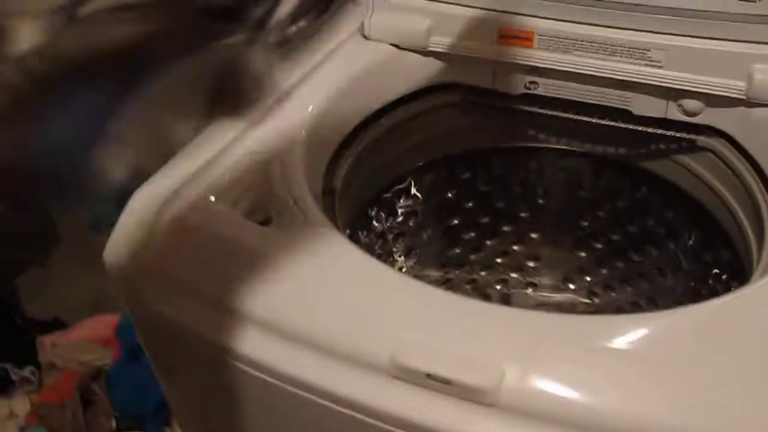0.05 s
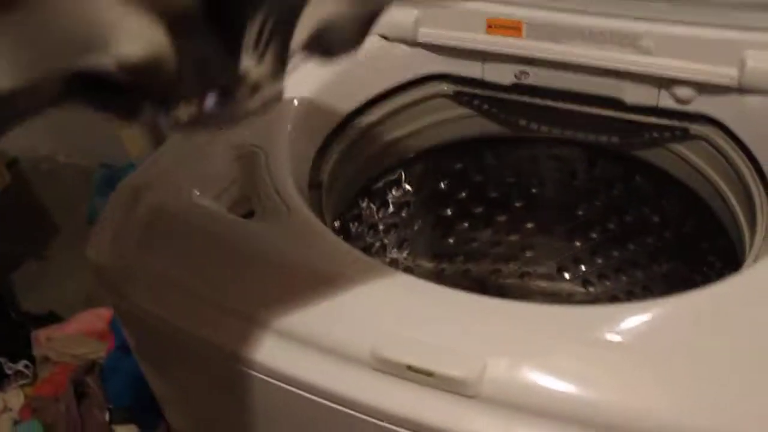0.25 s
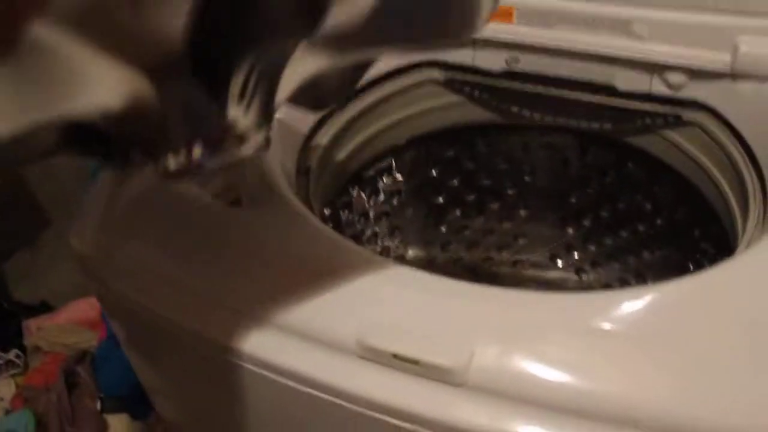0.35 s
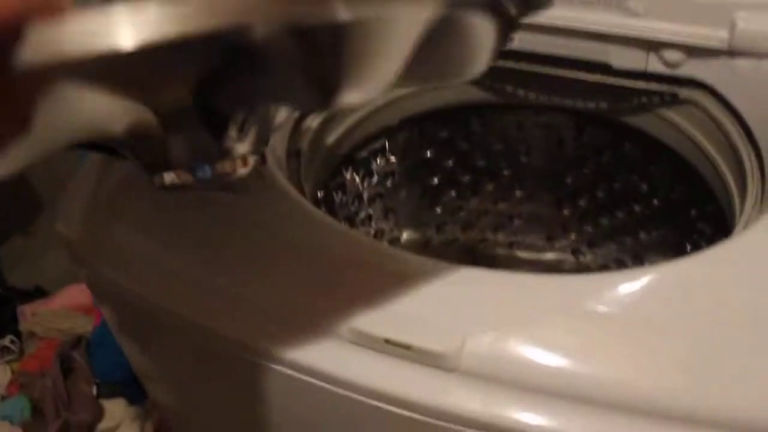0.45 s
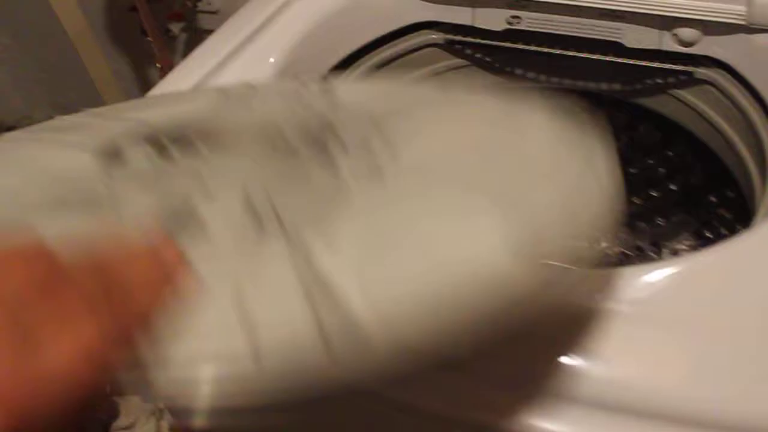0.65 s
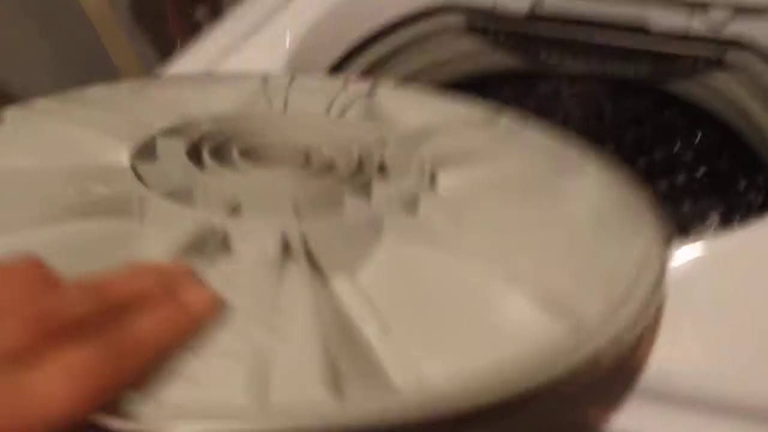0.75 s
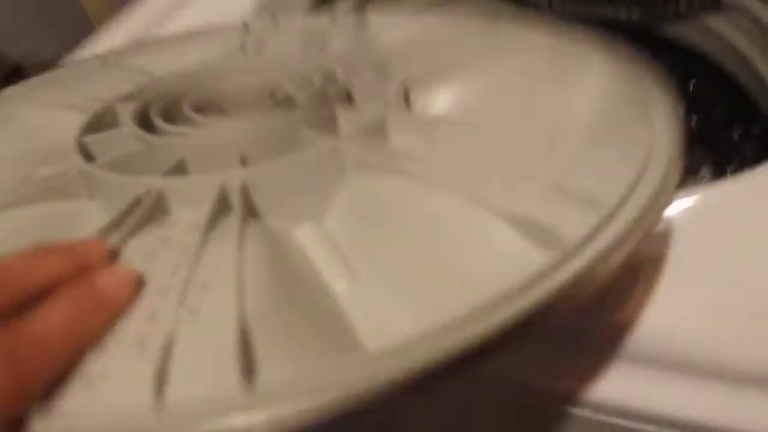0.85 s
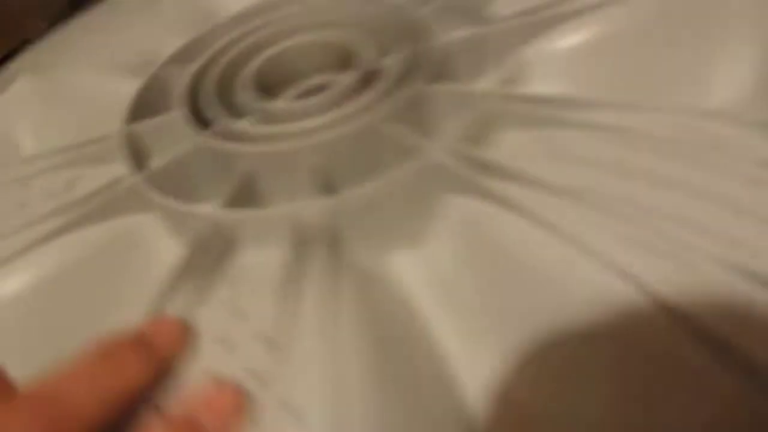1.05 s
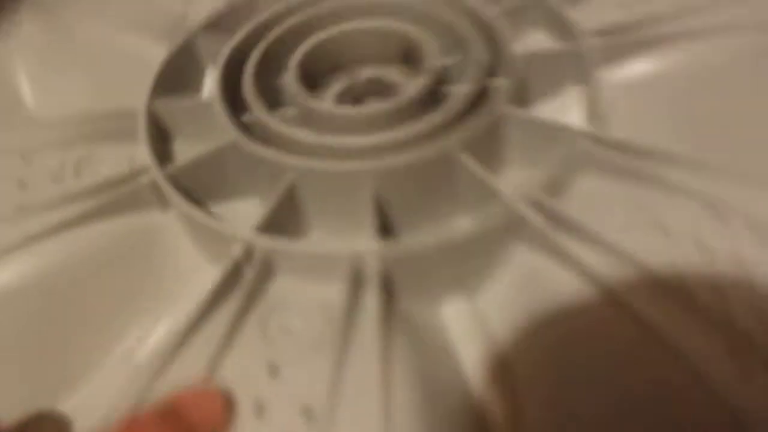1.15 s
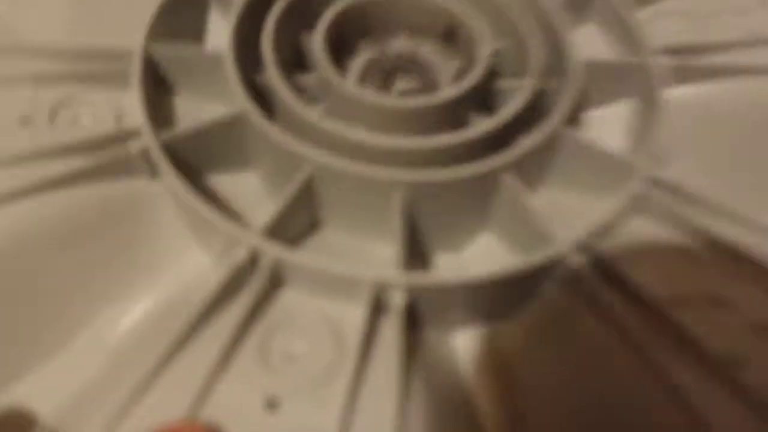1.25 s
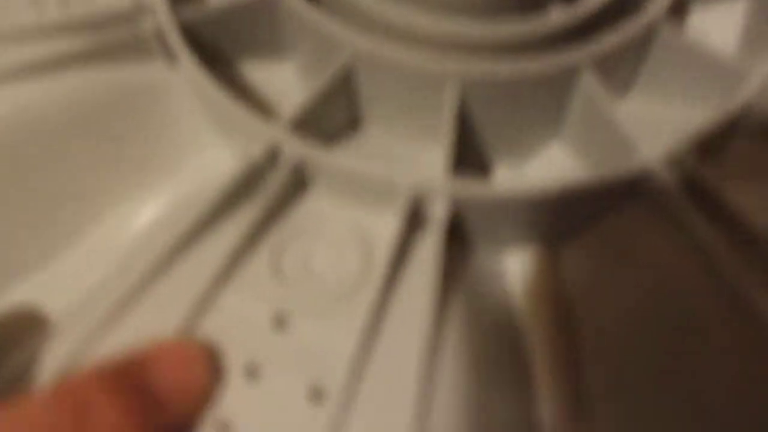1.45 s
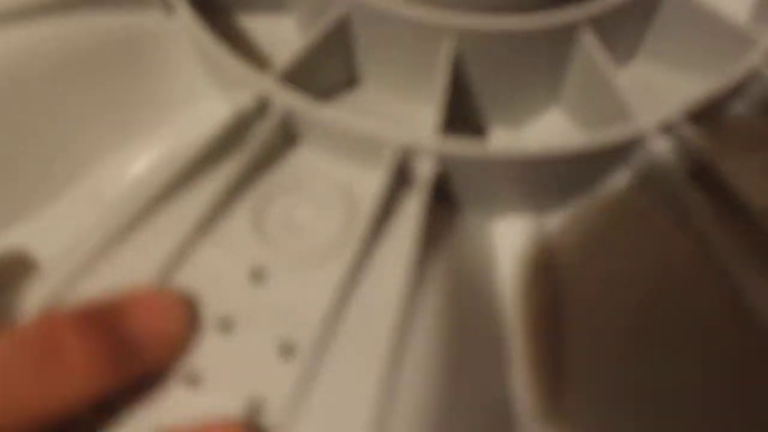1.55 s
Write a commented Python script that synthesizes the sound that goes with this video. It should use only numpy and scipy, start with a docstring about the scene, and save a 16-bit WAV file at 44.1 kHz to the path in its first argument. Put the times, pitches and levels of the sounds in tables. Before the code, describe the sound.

Sharp hard-plastic knocks, heard very close indoors. Brief sliding friction leads to clicks and an overloaded crack, then a clattering group with low cabinet boom, near quiet, and a last softer, hollow thud.

```python
"""A soft rub over a faint hum comes first, then clicks and knocks, the heavier with a hollow steel boom.
A ribbed plastic agitator plate is lifted, turned over and knocked on a washing machine in a small room.
Filtered noise makes the rub, rumble and air; a wavering sine makes the hum. Each knock is a noise crack
with damped plate modes and a room tail; heavy blows also excite damped modes of the cabinet.
The near microphone overloads on the hardest knock."""
import sys
import numpy as np
from scipy import signal
from scipy.fft import rfft, irfft, next_fast_len
from scipy.io import wavfile
from scipy.ndimage import uniform_filter1d, map_coordinates

SR = 44100
rng = np.random.default_rng(int(sys.argv[2]) if len(sys.argv) > 2 else 0)


def store_pcm(level_fs):
    """Save levels as 16-bit WAV."""
    pcm = np.round(np.clip(level_fs, -1, 1) * 32767).astype(np.int16)
    wavfile.write(sys.argv[1], SR, np.atleast_2d(pcm).T)


N = 70560  # samples in the scene
BLOW_SIZE = 24000  # samples in one blow

# quiet air of the room: frequency_hz, density_db
AIR_SPECTRUM = [(20, -41), (60, -18), (130, -6.5), (230, 4), (370, -4.5), (600, -14), (1100, -18),
                (2200, -22), (3500, -35.5), (8000, -45.5), (16000, -55.5)]
# strength of the hum: time_s, level_db
HUM_LEVEL = [(0, -49), (.15, -45), (.32, -48.5), (.45, -50.5), (1.6, -59.5)]
# low handling rumble: time_s, level_db
RUMBLE_LEVEL = [(0, -59.5), (.28, -65), (.6, -66), (.75, -40), (1.02, -48.5), (1.17, -56), (1.42, -50),
                (1.6, -47.5)]
# colour of the rumble: frequency_hz, density_db
RUMBLE_SPECTRUM = [(20, -42), (50, -29.5), (80, -4), (115, -2), (170, -11), (350, -11.5), (600, -30),
                   (2000, -59.5)]
# strength of the sliding friction: time_s, level_db
SLIDE_LEVEL = [(0, -47), (.04, -45), (.13, -42), (.2, -45), (.28, -50), (.34, -50.5), (.56, -55),
               (.645, -51), (.72, -42.5), (1, -65.5)]
# colour of the sliding friction: frequency_hz, density_db
SLIDE_SPECTRUM = [(200, -15), (350, -3.5), (700, -1.5), (1050, 1), (1400, -2.5), (2500, -6), (4500, -8),
                  (7000, -17), (11000, -19.5), (16000, -27.5)]
# light brushes of the fingers: centre_s, level_db, length_s
FINGER_BRUSHES = [(0.031, -43, 0.0032), (0.047, -44, 0.006), (1.084, -63, 0.0242), (1.148, -59, .016),
                  (1.59, -62, 0.0282)]
# blows that reach the cabinet: start_s, boom_db, panel_db
CABINET_BLOWS = [(0.356, -32, -33.5), (0.464, -37, -36), (.669, -25, -32.5), (0.759, -39, -53),
                 (0.829, -42, -40.5), (1.222, -25.5, -37), (1.385, -40, -39)]
# modes of the hollow cabinet: frequency_hz, level_db, t60_s
BOOM_MODES = [(86.7, 3, .36), (91.4, 1.5, 0.27), (99, -17, .2)]
# modes of the cabinet's panels: frequency_hz, level_db, t60_s
PANEL_MODES = [(133.6, -11.5, .6), (203.3, -5.5, 0.77), (242, -5.5, 0.25), (266.8, -5.5, 0.46),
               (307, -8.5, 0.76), (353.3, -7.5, .8), (379.6, -6.5, .55), (420, -10.5, 0.4), (490, -16.5, 1)]
# contacts of the plate: start_s, level_db, bass_db, middle_db, upper_middle_db, treble_db,
# crack_t60_s, ring_db, room_db, spot_hz (resonance of the struck spot), spot_db (its lift)
PLATE_CONTACTS = [(0.2075, -12.5, -15.5, 1, 2.5, 5.5, 0.0062, -8.5, -14, 1350, -2),
                  (0.2211, -29, -4, 6.5, 4.5, -12, 0.017, -13.5, -18, 1230, 12),
                  (.2578, -51, 1, 10, 1, 14, 0.013, -15, -26, 1800, -2),
                  (0.3458, -1, -2.5, 7, -4, -1.5, 0.011, -10.5, -16.5, 2900, 5),
                  (0.4477, -12, -3.5, 5, -6.5, -5.5, 0.0067, -9, -7, 3750, 8.5),
                  (0.6667, -9, -3, 2.5, -1.5, -2, .016, -25.5, -10, 5600, 8),
                  (0.6983, -24.5, -3, -2, -5, -3.5, .025, -7.5, -2.5, 5470, 6),
                  (.726, -32.5, -1.5, 4, -29, -2, .025, -8, -4.5, 2310, 22),
                  (0.7647, -17.5, -17, 4.5, 3, -8.5, 0.0073, -13.5, -10.5, 2150, 6.5),
                  (0.818, -42, 10, 14, 9, 0, 0.0087, -7.5, -3, 1530, 2),
                  (0.8415, -21.5, -8, 4.5, -2.5, -10, 0.019, -17, -7, 722, 19),
                  (0.8813, -35.5, 5, 6, 6, -31, 0.011, -6, -9.5, 690, 17),
                  (1.2204, -19.5, 9.5, 8, 7, -1.5, 0.03, -2.5, -7, 567, 12.5),
                  (1.2323, -26.5, 6.5, -2, 5.5, 0, 0.048, -10, -13, 2300, 4),
                  (1.241, -26, -17, -33, -4, 0.5, 0.02, -3.5, -3, 3540, 16),
                  (1.2698, -34, 13, 4.5, 2, -1.5, 0.0083, 3, -1, 1250, 11.5)]
# modes of the plate: frequency_hz, level_db, t60_s
PLATE_MODES = [(258.4, -5.5, 0.12), (546, -6.5, 0.033), (736.7, -12, .09), (892, -8.5, .045),
               (1043, -5, 0.018), (1156, -7, 0.039), (2054, -11.5, 0.12), (2595, -8, .08),
               (3260, -9.5, 0.044), (3783, -23.5, 0.21), (4480, -6, 0.051), (4690, -4.5, 0.03),
               (4894, -4, 0.043), (5670, 0, 0.019)]
# colour of the contact crack: frequency_hz, density_db
CRACK_SPECTRUM = [(30, -37.5), (150, -17), (290, 6.5), (420, 6), (680, 1.5), (1000, -3), (1450, -1.5),
                  (2900, 4), (3700, -3), (4800, -3.5), (7200, -4), (12000, -6), (16000, -14)]
# colour of the room's answer: frequency_hz, density_db
ROOM_SPECTRUM = [(30, -37.5), (70, -25), (160, -10), (260, 2.5), (600, -1.5), (1100, -4.5), (1600, 4.5),
                 (2600, 0), (5200, -3.5), (7500, -8), (12000, -11.5), (16000, -10.5)]
# decay of the room's answer: frequency_hz, t60_s
ROOM_DECAY = [(100, 0.55), (300, 0.53), (700, 0.45), (1400, .19), (4000, 0.19), (10000, 0.13),
              (16000, 0.07)]

AIR_DB = -52.5
HUM_HZ, HUM_WAVER = 240.5, 0.003  # waver is a fraction of the pitch
BOOM_RISE_S, PANEL_RISE_S = 0.012, 0.0067  # time constants
CRACK_RISE_S, ROOM_RISE_S = 0.0001, 0.00067  # time constants
SNAP_DB = 0.5  # relative strength of the impulse that opens a crack
EVEN_HZ = 140  # width over which a crack's power is evened out
SPOT_OCTAVES = 0.33  # half width of a spot's resonance
CLIP_TOP = 0.85  # ceiling of the overload, full scale = 1
LOW_CUT_HZ, TOP_HZ, EDGE_HZ = 52, 16200, 600


def amp(db):
    """Level as amplitude: 20 dB is a tenfold gain."""
    return 10 ** (np.asarray(db) / 20)


def unit(x):
    """Normalization of signal power: scale to rms 1."""
    return x / np.sqrt(np.mean(x ** 2) + 1e-20)


def along(points, hz):
    """Logarithmic frequency scale: interpolate (Hz, value) points along it."""
    f, v = np.transpose(points)
    return np.interp(np.log(hz + 1), np.log(f + 1), v)


def coloured(x, *curves):
    """Minimum-phase filtering: the folded cepstrum of the summed (Hz, dB) curves gives a causal response."""
    m = 2 * next_fast_len(len(x) // 2 + 2048, real=True)
    hz = np.fft.rfftfreq(m, 1 / SR)
    gain = amp(sum(along(points, hz) for points in curves))
    cepstrum = irfft(np.log(gain), m)
    cepstrum[1:m // 2] *= 2
    cepstrum[m // 2 + 1:] = 0
    response = np.exp(rfft(cepstrum))
    return irfft(rfft(x, m) * response, m)[:len(x)]


def noise(points, size=N):
    """Spectral shaping: white noise is coloured and brought to rms 1."""
    return unit(coloured(rng.standard_normal(size), points))


def wobble(rate):
    """Slow random modulation: a smooth curve through rate knots a second."""
    knots = rng.standard_normal(int(N * rate / SR) + 4)
    return map_coordinates(knots, [np.arange(N) * rate / SR])


def level(points):
    """Amplitude envelope: an (s, dB) curve as a gain for every sample."""
    return amp(np.interp(np.arange(N) / SR, *np.transpose(points)))


def fade(t60):
    """Exponential decay: gain falls by 60 dB in t60 seconds."""
    return np.exp(-np.log(1000) * np.arange(BLOW_SIZE) / SR / t60)


def rise(seconds):
    """Exponential build-up: gain grows from 0 towards 1 with this time constant."""
    return 1 - np.exp(-np.arange(BLOW_SIZE) / SR / seconds)


def ring(modes, scatter_db, detune):
    """Modal superposition: damped sines with random sign, level and pitch scatter at each blow."""
    t = np.arange(BLOW_SIZE) / SR
    chance = rng.standard_normal((len(modes), 3))
    out = np.zeros(BLOW_SIZE)
    for (hz, db, t60), (level_shift, pitch_shift, polarity) in zip(modes, chance):
        tone = np.sin(2 * np.pi * hz * (1 + detune * pitch_shift) * t)
        out += amp(db + scatter_db * level_shift) * fade(t60) * np.sign(polarity) * tone
    return out


def add(out, s, x):
    """Linear superposition: mix x in from time s, its last tenth eased out."""
    i = max(0, round(s * SR))
    eased = x * np.minimum(1, np.linspace(10, 0, len(x)))
    out[i:i + len(x)] += eased[:N - i]


def air():
    """Broadband background: steady coloured noise stands for the quiet air of the room."""
    return amp(AIR_DB) * noise(AIR_SPECTRUM)


def hum():
    """Frequency modulation: a faint sine of nearly steady pitch and level, strongest near the start."""
    hz = HUM_HZ * (1 + HUM_WAVER * wobble(10))
    phase = 2 * np.pi * np.cumsum(hz) / SR
    return level(HUM_LEVEL) * np.sin(phase) * amp(wobble(12))


def rumble():
    """Low-frequency random vibration: the carried plate rumbles as coloured noise."""
    return level(RUMBLE_LEVEL) * noise(RUMBLE_SPECTRUM)


def rubbing():
    """Friction noise: plastic slides over the lid with random strength and fingers brush the ribs."""
    t = np.arange(N) / SR
    scrape = level(SLIDE_LEVEL) * noise(SLIDE_SPECTRUM) * amp(1.8 * wobble(150))
    touch = sum(amp(db) * np.exp(-(2 * (t - s) / length) ** 2) for s, db, length in FINGER_BRUSHES)
    brush_spectrum = [(300, -14.5), (2200, 0.5), (5000, -6), (10000, -6), (16000, -12)]  # Hz, dB
    return scrape + touch * noise(brush_spectrum)


def cabinet():
    """Modal resonance: the steel shell swells into a low boom and its panels ring on."""
    out, t = np.zeros(N), np.arange(BLOW_SIZE) / SR
    boom = sum(amp(db) * fade(t60) * np.sin(2 * np.pi * hz * t) for hz, db, t60 in BOOM_MODES)
    boom = boom * rise(BOOM_RISE_S) ** 2
    for s, boom_db, panel_db in CABINET_BLOWS:
        panels = ring(PANEL_MODES, scatter_db=2, detune=0.012) * rise(PANEL_RISE_S)
        add(out, s, amp(boom_db) * boom + amp(panel_db) * panels)
    return out


def room_tail():
    """Frequency-dependent reverberation: in the room's answer to a blow the treble dies first."""
    hz, t, z = signal.stft(noise(ROOM_SPECTRUM, size=BLOW_SIZE), SR, nperseg=256)
    z = z * np.exp(-np.log(1000) * t / along(ROOM_DECAY, hz)[:, None])
    tail = signal.istft(z, SR, nperseg=256)[1][:BLOW_SIZE]
    return tail * rise(ROOM_RISE_S)


def burst(t60):
    """Impact excitation: brief chatter at the contact, its energy spread evenly over frequency."""
    force = rng.standard_normal(BLOW_SIZE) * fade(t60) * rise(CRACK_RISE_S)
    force[2] += 2 * amp(SNAP_DB)
    z = rfft(force)
    power = np.abs(uniform_filter1d(np.abs(z) ** 2, int(EVEN_HZ * BLOW_SIZE / SR)))
    even = irfft(z * np.sqrt(power.mean() / power))
    return even * (np.arange(BLOW_SIZE) < BLOW_SIZE // 2)  # keep the first half only


def plate():
    """Impact and modal response: each contact cracks and rings the plate, coloured by the struck spot."""
    out = np.zeros(N)
    for (s, db, bass_db, middle_db, upper_db, treble_db,
         crack_t60, ring_db, room_db, spot_hz, spot_db) in PLATE_CONTACTS:
        colour = [(520, bass_db), (850, middle_db), (1150, middle_db), (1450, upper_db),
                  (2700, 0.028), (4800, 0.011), (9500, treble_db)]
        resonance = [(spot_hz / 2 ** SPOT_OCTAVES, 0), (spot_hz, spot_db), (spot_hz * 2 ** SPOT_OCTAVES, 0)]
        crack = 2 * coloured(burst(crack_t60), CRACK_SPECTRUM)
        ringing = amp(ring_db) * ring(PLATE_MODES, scatter_db=0, detune=0.0014)
        direct = coloured(crack + ringing, resonance)
        knock = coloured(direct + amp(room_db) * room_tail(), colour)
        add(out, s, amp(db) * knock)
    return out


def scene():
    """Superposition of sources: air, hum, rumble and rubbing lie under the cabinet and the plate."""
    return (air() + hum() + rumble() + rubbing() + cabinet() + plate())[None]


def record(dry):
    """Microphone limits: deep bass is cut, the hardest peaks saturate and the treble is band-limited."""
    high_pass = signal.butter(2, LOW_CUT_HZ, "highpass", fs=SR, output="sos")
    dry = signal.sosfilt(high_pass, dry)
    clipped = dry / (1 + np.abs(dry / CLIP_TOP) ** 6) ** (1 / 6)
    m = next_fast_len(N + SR // 2)
    edge = np.clip((TOP_HZ - np.fft.rfftfreq(m, 1 / SR)) / EDGE_HZ, 0, 1)
    return irfft(rfft(clipped, m) * np.sin(edge * np.pi / 2) ** 2, m)[..., :N]


dry = scene()
out = record(dry)
store_pcm(out)
```